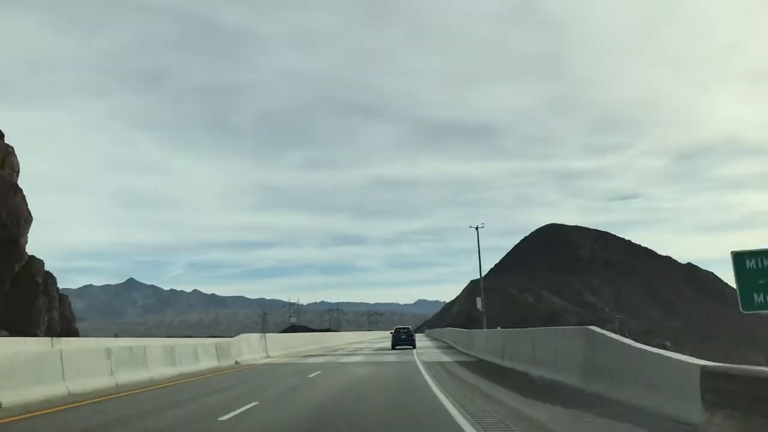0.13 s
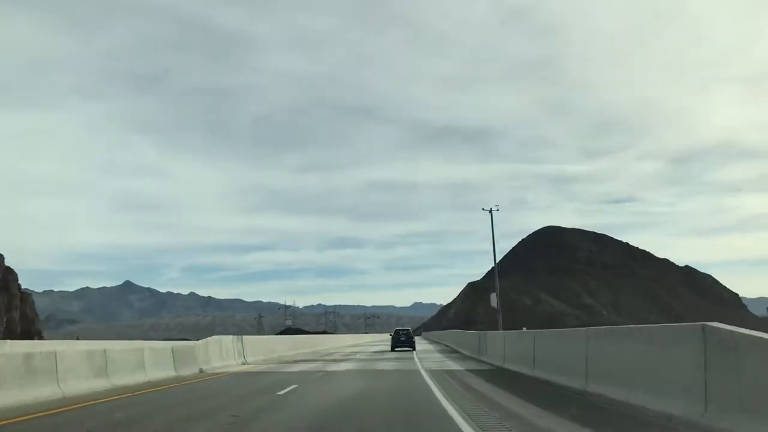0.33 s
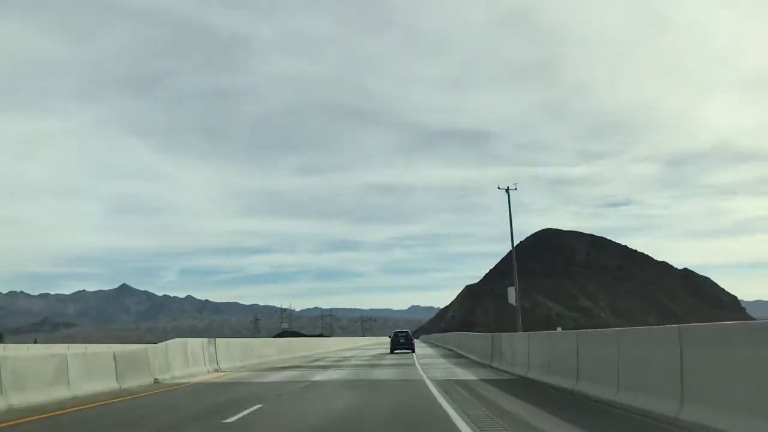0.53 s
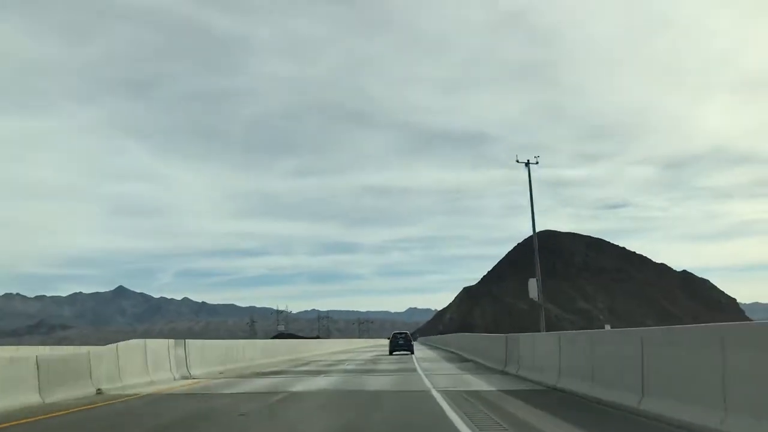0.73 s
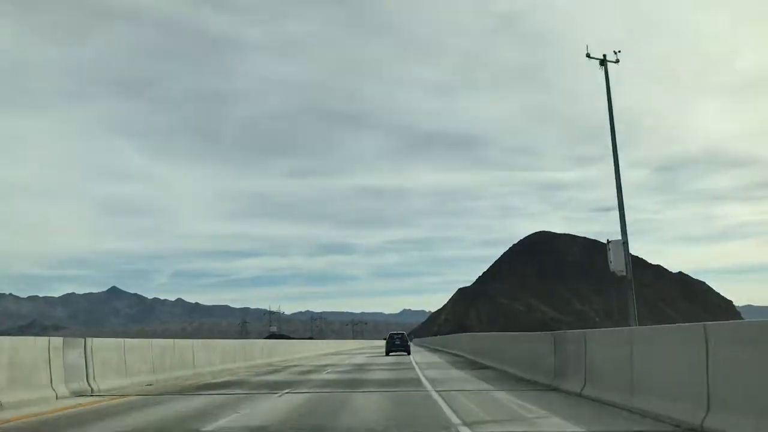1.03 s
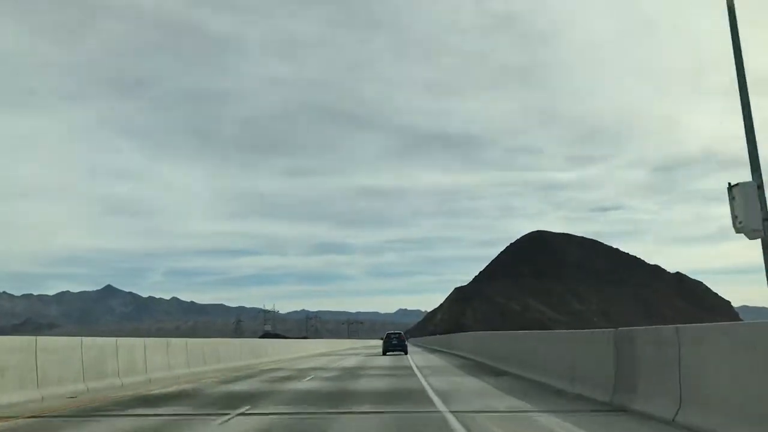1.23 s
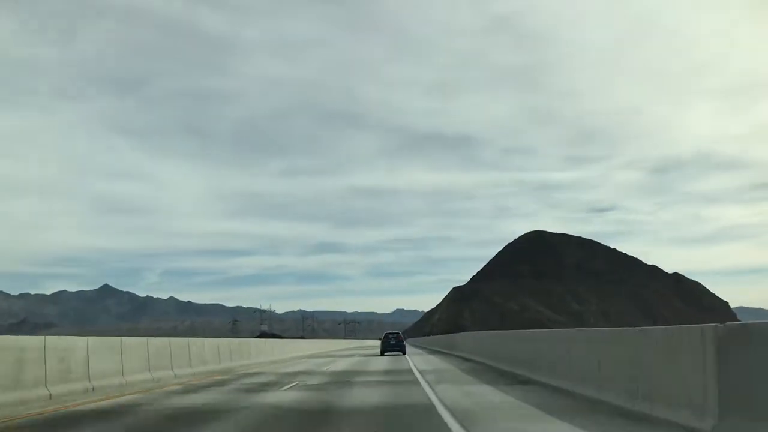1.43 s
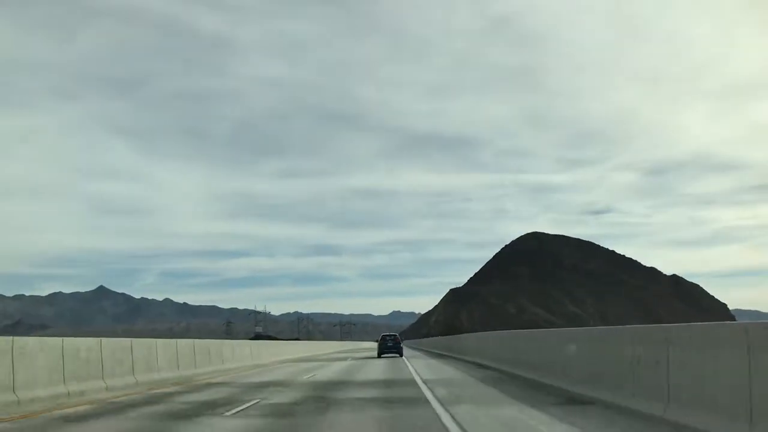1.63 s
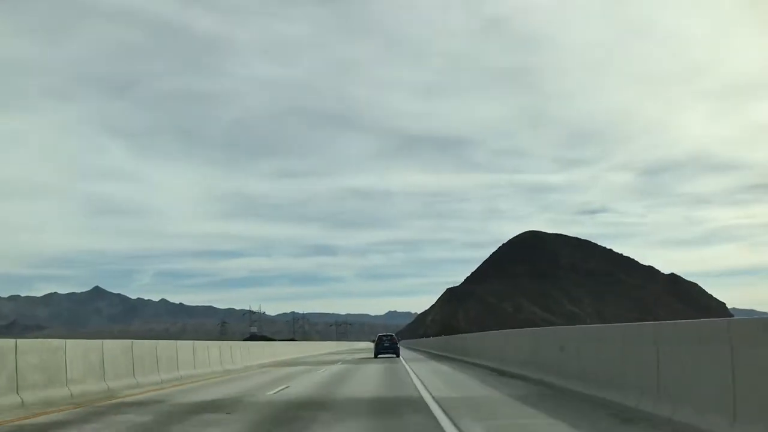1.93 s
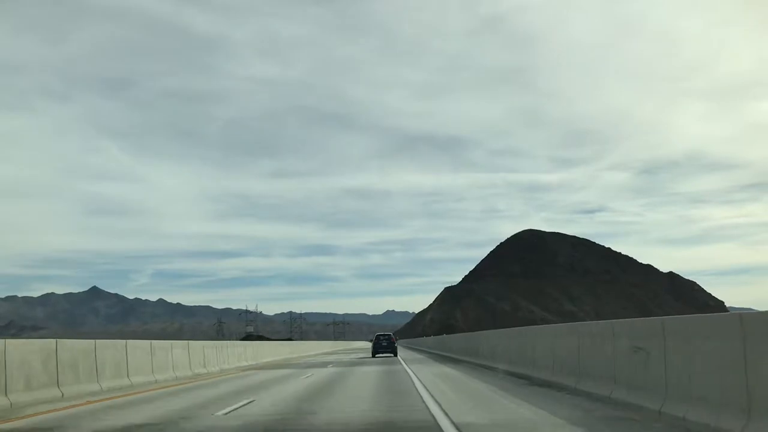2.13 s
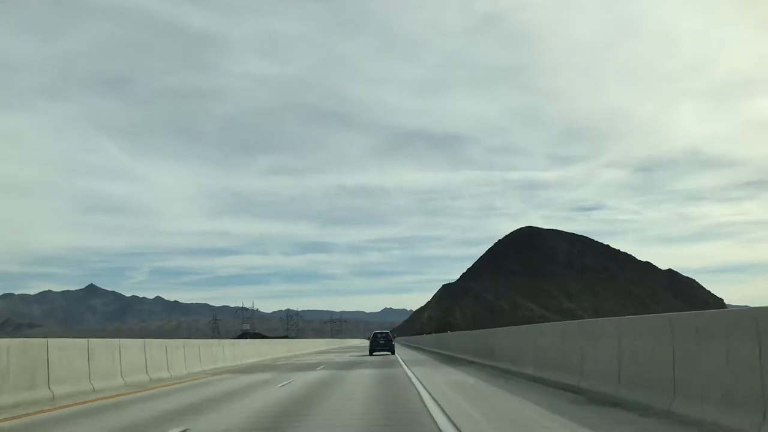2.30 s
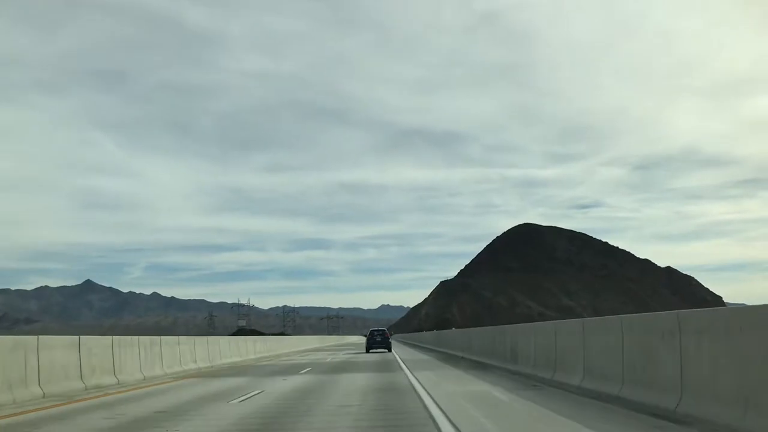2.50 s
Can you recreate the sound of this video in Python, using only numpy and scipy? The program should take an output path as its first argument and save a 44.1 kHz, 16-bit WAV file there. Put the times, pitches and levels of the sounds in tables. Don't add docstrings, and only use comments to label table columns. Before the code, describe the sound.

Inside a fast-moving car, bassy cabin rumble and muffled tyre roar run throughout with faint wind hiss. Two close, heavy joint thumps hit past the middle, the second clattering, then fade into road noise; close phone pickup.

```python
import sys
import numpy as np
from scipy import signal
from scipy.fft import rfft, irfft
from scipy.io import wavfile
from scipy.ndimage import uniform_filter1d

SR = 44100
rng = np.random.default_rng(int(sys.argv[2]) if len(sys.argv) > 2 else 0)


def boost_factor(decibels):
    exponent = np.asarray(decibels, float) / 20
    return 10 ** exponent


def waveform_to_disk(signal):
    frames = np.transpose(np.atleast_2d(signal))
    scaled = np.clip(frames, -1, 1) * 32767
    samples = np.round(scaled).astype(np.int16)
    wavfile.write(sys.argv[1], SR, samples)


N = 117306

# [t/s, level/dB]
WHINE_LEVELS = [(0.0, -87), (0.35, -83), (0.42, -87), (0.61, -83), (1.04, -88), (1.16, -78), (1.27, -84),
                (1.35, -77), (1.38, -89), (1.47, -82), (1.76, -82), (1.8, -77), (1.84, -85), (2.19, -87),
                (2.24, -80), (2.53, -82), (2.63, -89), (2.66, -81)]
WHINE_HZ, WHINE_FLICKER_DB, WHINE_LIFT_DB = 14852, 1.2, 3.5
# [f/Hz, level/dB]
WIND_COLOUR = [(1800, -9), (2700, -1), (3300, 0), (4000, -7.5), (4800, -17), (6500, -25), (8000, -30.5)]
# [t/s, body shake level/dB, tyre roar level/dB, wind level/dB]
ROAD_LEVELS = [(0, -27, -43.5, -56), (.06, -26, -43, -64), (.26, -27, -42.5, -60),
               (0.421, -23.5, -42.5, -64), (0.62, -24.5, -43.5, -62), (.82, -26.5, -43, -65.5),
               (1.001, -26, -42.5, -64), (1.149, -26, -43.5, -60.5), (1.451, -26.5, -41.5, -59.5),
               (1.599, -29, -41, -61.5), (1.8, -24, -50.5, -62), (2.0, -27.5, -48.5, -61),
               (2.151, -25, -45.5, -60.5), (2.26, -27.5, -47, -60), (2.421, -23, -43.5, -59),
               (2.519, -24, -44.5, -61), (2.66, -24.5, -38.5, -60.5)]
# [f/Hz, level/dB]
ROAR_COLOUR = [(250, -3), (420, 0.5), (600, 0), (900, -6.5), (1150, -11), (1550, -17), (2100, -25),
               (3000, -22)]
# [f/Hz, width/Hz, level/dB]
CABIN_MODES = [(43.4, 18, -22.5), (53.3, 7.9, -3.5), (87.5, 30, -5.5), (115.05, 26.4, -2.5),
               (171.9, 34, -8.5), (216.5, 54, -10.5), (311, 49, -14), (347, 65, -20.5)]
# [f/Hz, level/dB]
PAN_COLOUR = [(32, -3), (55, -5), (100, 0), (150, -9), (250, -11), (350, -18), (450, -27)]
PAN_DB = -3
# [f/Hz, width/Hz, level/dB]
DECK_SONG = [(848, 240, -1.5), (961, 230, -0.5), (1175, 400, -8.5), (1520, 280, -7), (1684, 430, -10.5),
             (1964, 77, -13), (2520, 1100, -11)]
DECK_FROM_S, DECK_START_DB, DECK_SWELL_DB_PER_S = 1.497, -46.5, 4.5
# [t/s, level/dB, f/Hz]
TRIM_TICKS = [
    (0.603, -33.5, 776),
    (1.36, -74, 6160),
    (1.603, -78, 9080),
    (1.833, -41.5, 2650),
    (2.186, -60, 8100),
]
# [t/s, level/dB, length/s, centre f/Hz, width/octaves]
TREAD_SCUFFS = [(1.528, -29.5, 0.017, 495, 0.85), (1.534, -49, 0.034, 1720, 0.83),
                (1.554, -39, .02, 1100, 0.9), (1.823, -51, 0.029, 2900, 0.56),
                (1.85, -55.5, 0.02, 3140, 0.62), (1.828, -63.5, .024, 5000, 0.76),
                (1.835, -25, 0.029, 696, 0.87), (1.868, -41.5, 0.036, 786, 1.2),
                (1.935, -34.5, 0.02, 680, 1.13), (1.956, -35, 0.036, 584, 0.92),
                (2.517, -40, 0.0091, 600, 2.2)]
SCUFF_EDGE_S = 0.011
# [f/Hz, level/dB, t60/s]
PLATE_MODES = [(315.4, 8.5, 0.024), (461.5, 0, 0.029), (539, 1, 0.046), (640, -9, 0.12), (731, 2, 0.052),
               (798, 0, 0.055), (926, -9.5, 0.14), (973, -8.5, 0.052), (1100, -15.5, .045),
               (1415, -22.5, .03)]
# [t/s, level/dB, length/s, brightest f/Hz]
PLATE_RATTLES = [
    (1.522, -24.5, 0.015, 440),
    (1.633, -39, 0.018, 481),
    (1.832, -11, 0.0054, 850),
    (1.846, -11, 0.0087, 730),
    (1.858, -15.5, .008, 800),
    (1.87, -26.5, 0.021, 820),
    (1.95, -26, 0.015, 736),
    (1.96, -30.5, 0.03, 590),
    (2.028, -43, 0.019, 970),
]
CLANK_RISE_S, CLANK_SLOPE_DB = 0.0032, 8
JOINTS_TOP_HZ = 5000
# [t/s, boom level/dB, deck sway level/dB]
WHEEL_BLOWS = [(0.058, -23, -36), (0.385, -18.5, -33.5), (0.78, -21.5, -33.5), (1.053, -20, -39),
               (1.538, -8.5, -26.5), (1.548, -13.5, -31), (1.557, -17.5, -30), (1.582, -15.5, -28),
               (1.612, -16, -33), (1.646, -8.5, -20.5), (1.665, -9, -24), (1.7, -20, -30.5),
               (1.842, -13, -11.5), (1.866, -12, -18), (1.903, -23, -35), (1.944, -19.5, -20),
               (1.963, -11, -10.5), (2.028, -22, -9.5), (2.133, -23, -16), (2.39, -18, -38)]
# [f/Hz, level/dB, t60/s]
BOOM_MODES = [(66.7, -6.5, 1), (83.7, -1.5, 0.5), (108.7, 2.5, 0.15), (191.2, -1.5, 0.14),
              (225.1, -6.5, 0.32), (285.6, -8, 0.095)]
SWAY_HZ, SWAY_T60_S, PUSH_S = 44, 0.16, 0.0031
# [f/Hz, level/dB]
HISS_COLOUR = [(4000, 1), (6000, 2), (7800, -2), (9000, 0), (10500, -4), (12500, -1), (15500, -1)]
HISS_DB, LOUD_HISS_DB = -78.5, 9.5
LOUD_FROM_S, LOUD_TO_S = 1.557, 2.546
# [f/Hz, level/dB]
FIZZ_COLOUR = [(12500, -12), (13800, -4.5), (15700, 1.5)]
FIZZ_DB = -83.5
SKEW, CEILING, START_S = 0.3, 0.75, 0.006


def level(x, db):
    return x * boost_factor(db) / np.sqrt(np.mean(x ** 2))


def ring(x, hz, t60):
    pole = np.exp(2j * np.pi * hz / SR - np.log(1000) / (t60 * SR))
    return signal.lfilter([1], [1, -pole], x).imag


def band(hz, width):
    t60 = np.log(1000) / (np.pi * width)
    once = ring(rng.standard_normal(N + SR), hz, t60)
    return level(ring(once, hz, t60)[SR:], 0)


def walk(rate):
    hold = int(SR / rate)
    steps = np.repeat(rng.standard_normal(N // 200 + 1), hold)[:N]
    return 1.01 * uniform_filter1d(uniform_filter1d(steps, hold), hold)


def colour(points, flicker_db, shared):
    f = np.maximum(np.arange(N // 2 + 1) * SR / N, 1)
    hz, db = np.array(points).T
    ends_hz = np.r_[hz[0] / 4, hz, hz[-1] * 2]
    ends_db = np.r_[db[0] - 70, db, db[-1] - 70]
    whole = rfft(rng.standard_normal(N)) * boost_factor(np.interp(np.log(f), np.log(ends_hz), ends_db))
    lowest = int(3 * np.log2(ends_hz[0])) + 2
    highest = min(int(3 * np.log2(ends_hz[-1])), 43)
    out = 0
    for third in np.arange(lowest, highest):
        part = np.cos(np.pi / 2 * np.clip(3 * np.log2(f) - third, -1, 1)) ** 2
        out = out + irfft(whole * part, N) * boost_factor(flicker_db * walk(15) + shared)
    return level(out, 0)


def electronics_whine(t):
    db = np.interp(t, *np.array(WHINE_LEVELS).T) + WHINE_LIFT_DB + WHINE_FLICKER_DB * walk(11)
    return np.sqrt(2) * boost_factor(db) * np.sin(2 * np.pi * WHINE_HZ * t + 0.6 * walk(20))


def wind(wind_db):
    return level(colour(WIND_COLOUR, 0.8, 0.8 * walk(30)), 1) * boost_factor(wind_db)


def tyre_roar(roar_db, grain):
    return level(colour(ROAR_COLOUR, 0.74, 0.96 * grain), 2.88) * boost_factor(roar_db)


def cabin_rumble(shake_db, grain):
    body = sum(boost_factor(db + 0.95 * walk(13.0) + 1.7 * grain) * band(hz, width) for hz, width, db in CABIN_MODES)
    pan = boost_factor(PAN_DB) * colour(PAN_COLOUR, 1.4, 0.9 * grain)
    return level(level(body, 0) + pan, 2.05) * boost_factor(shake_db)


def road(t):
    times, *curves = np.array(ROAD_LEVELS).T
    shake_db, roar_db, wind_db = (np.interp(t, times, curve) for curve in curves)
    grain = walk(17)
    return wind(wind_db) + tyre_roar(roar_db, grain) + cabin_rumble(shake_db, grain)


def deck_song(t):
    song = sum(boost_factor(db + 3.9 * walk(9)) * band(hz, width) for hz, width, db in DECK_SONG)
    since = t - DECK_FROM_S
    return level(song, DECK_START_DB) * boost_factor(DECK_SWELL_DB_PER_S * since) * np.clip(since / 0.17, 0, 1)


def trim_ticks(t):
    noise = np.sign(rng.standard_normal(N))
    out = np.zeros(N)
    for s, db, hz in TRIM_TICKS:
        tap = noise * np.exp(-((t - s) / 0.0036) ** 2)
        tick = ring(ring(tap, hz, 14 / hz), hz, 14 / hz)
        out += boost_factor(db) * tick / np.abs(tick).max()
    return out


def tread_scuffs(t):
    noise, out = rng.standard_normal(N), np.zeros(N)
    for s, db, length, hz, width in TREAD_SCUFFS:
        near = slice(int((s - 0.05) * SR), int((s + 0.1) * SR))
        limits = hz * 2 ** (np.array([-width, width]) / 2)
        puff = signal.sosfilt(signal.butter(3, limits, "band", fs=SR, output="sos"), noise[near])
        puff = puff / (np.sqrt(uniform_filter1d(puff ** 2, int(3 * SR / hz))) + 0.3 * np.std(puff))
        inside = np.minimum(t[near] - s, s + length - t[near] + SCUFF_EDGE_S)
        edge = np.clip(inside / SCUFF_EDGE_S, 0, 1) ** 2
        out[near] += boost_factor(db) * edge * puff / np.sqrt(np.sum((edge * puff) ** 2) / np.sum(edge ** 2))
    return out


def plate_clanks(t):
    bursts = []
    for s, _, length, _ in PLATE_RATTLES:
        rise = np.clip((t - s) / CLANK_RISE_S, 0, 1)
        fall = np.clip((s + length - t) / CLANK_RISE_S + 1, 0, 1)
        bursts.append(rise * fall)
    out = np.zeros(N)
    for hz, db, t60 in PLATE_MODES:
        rattle = np.cos(2 * np.pi * hz * t + 1.32 * walk(150))
        drive = np.zeros(N)
        for (_, clank_db, _, brightest), burst in zip(PLATE_RATTLES, bursts):
            drive += boost_factor(clank_db - CLANK_SLOPE_DB * abs(np.log2(hz / brightest))) * burst
        out += boost_factor(db - 2) * np.log(1000) / (t60 * SR) * ring(drive * rattle, hz, t60)
    return out


def joints(t):
    boom, sway = np.zeros(N), np.zeros(N)
    for s, boom_db, sway_db in WHEEL_BLOWS:
        push = np.sin(np.pi * np.clip((t - s) / PUSH_S, 0, 1)) ** 2 * 2 / (PUSH_S * SR)
        boom += boost_factor(boom_db) * push
        sway += boost_factor(sway_db) * push
    out = plate_clanks(t)
    for k, (hz, db, t60) in enumerate(BOOM_MODES):
        out += (-1) ** k * boost_factor(db - 3.0) * ring(boom, hz, t60)
    damped = signal.sosfilt(signal.butter(4, JOINTS_TOP_HZ, fs=SR, output="sos"), out)
    return damped + ring(sway, SWAY_HZ, SWAY_T60_S)


def scene():
    t = np.arange(N) / SR
    background = electronics_whine(t) + road(t) + deck_song(t)
    return (background + trim_ticks(t) + tread_scuffs(t) + joints(t))[None]


def self_noise(t):
    loud = np.clip((t - LOUD_FROM_S) / 0.004, 0, 1) * np.clip((LOUD_TO_S - t) / 0.0024, 0, 1)
    hiss = colour(HISS_COLOUR, 0.3, 0 * t) * boost_factor(HISS_DB + LOUD_HISS_DB * loud)
    return hiss + colour(FIZZ_COLOUR, 1.5, 0 * t) * boost_factor(FIZZ_DB) * (t < LOUD_FROM_S)


def band_limit(x):
    return signal.sosfilt(signal.butter(12, 15762, fs=SR, output="sos"), x)


def record(dry):
    t = np.arange(N) / SR
    fade = np.clip(np.minimum(t, N / SR - t + START_S / 2) / START_S, 0, 1)
    capsule = (dry + SKEW * dry ** 2) * fade
    x = signal.sosfilt(signal.butter(4, 27, "high", fs=SR, output="sos"), capsule)
    x = CEILING * np.tanh(x / CEILING)
    return band_limit(x + self_noise(t))


dry = scene()
out = record(dry)
waveform_to_disk(out)
```